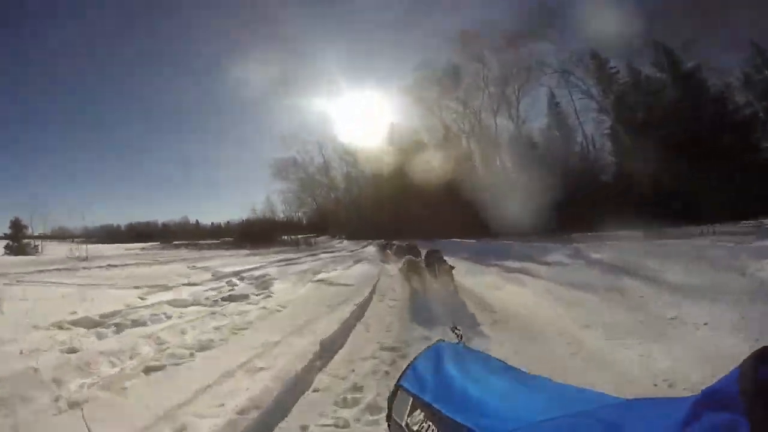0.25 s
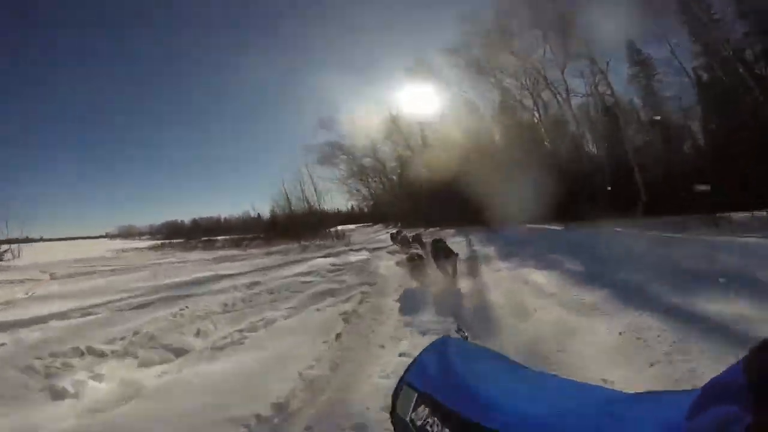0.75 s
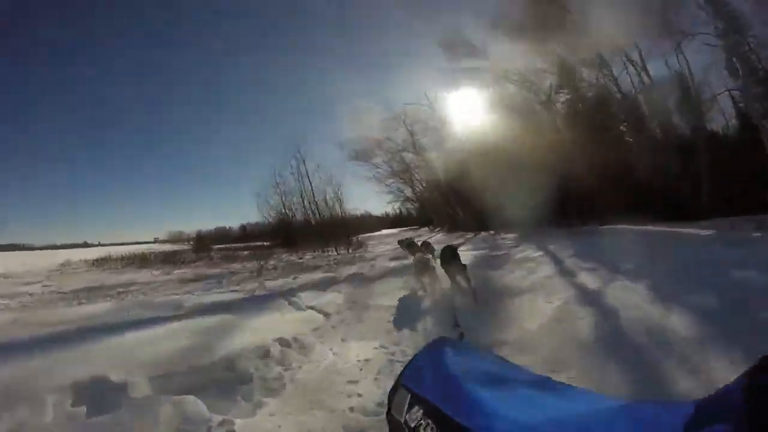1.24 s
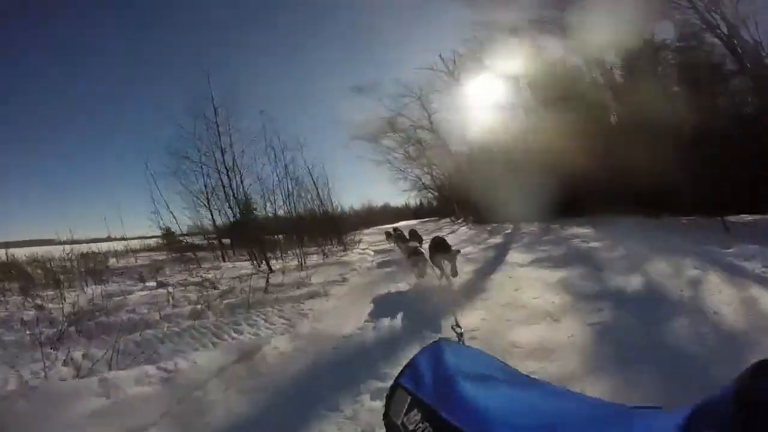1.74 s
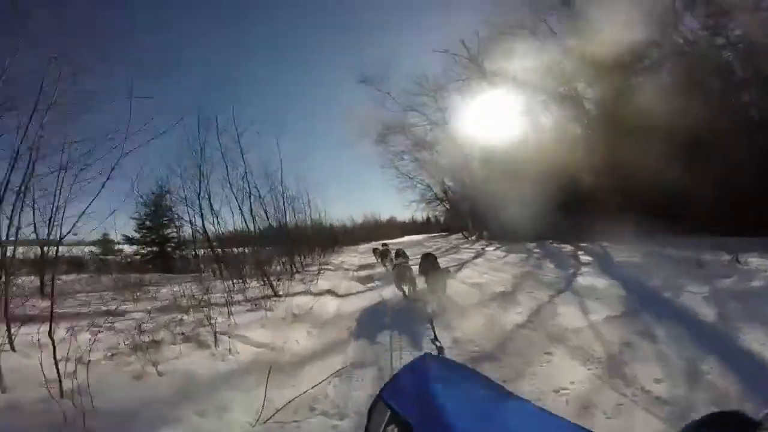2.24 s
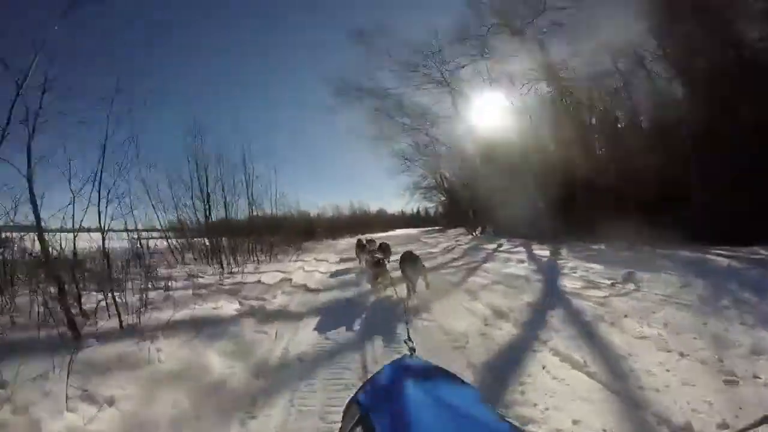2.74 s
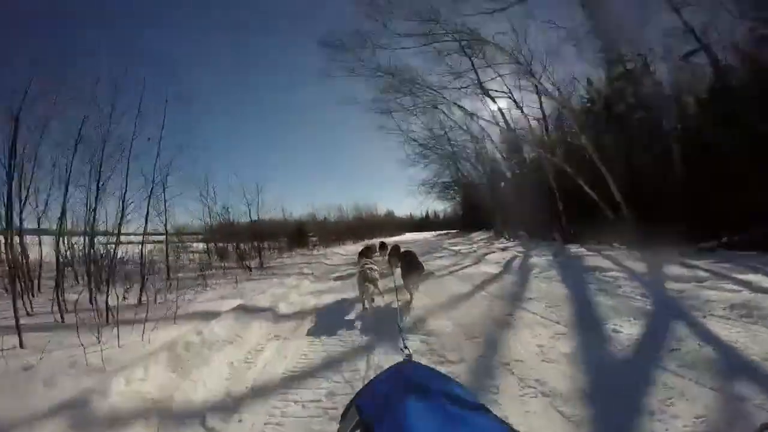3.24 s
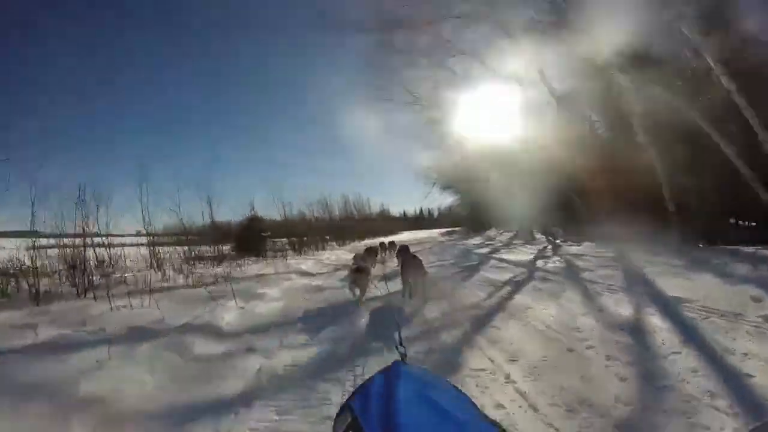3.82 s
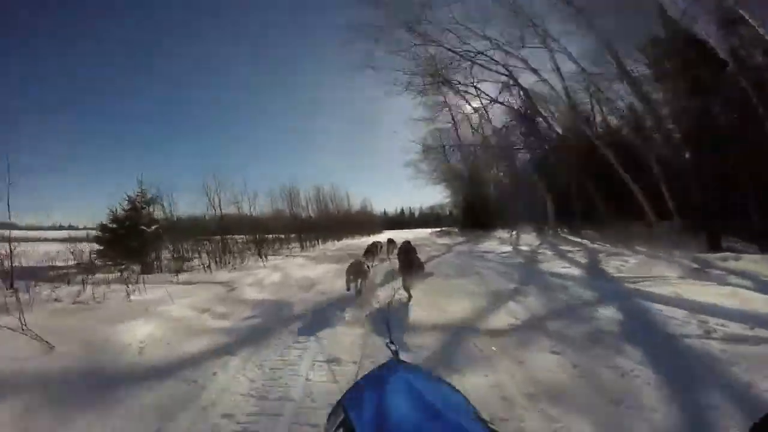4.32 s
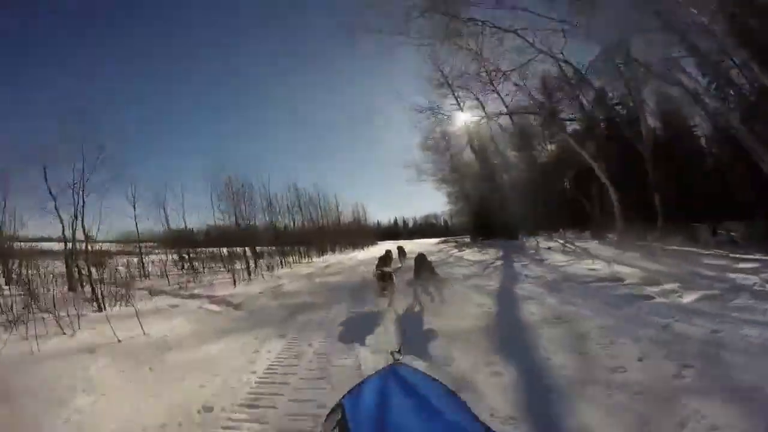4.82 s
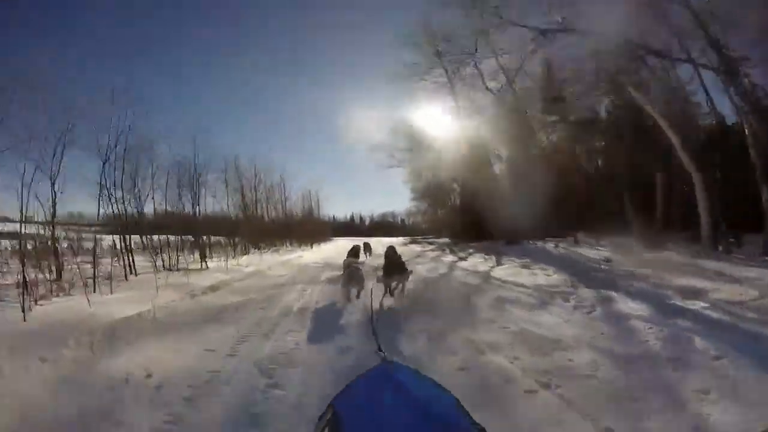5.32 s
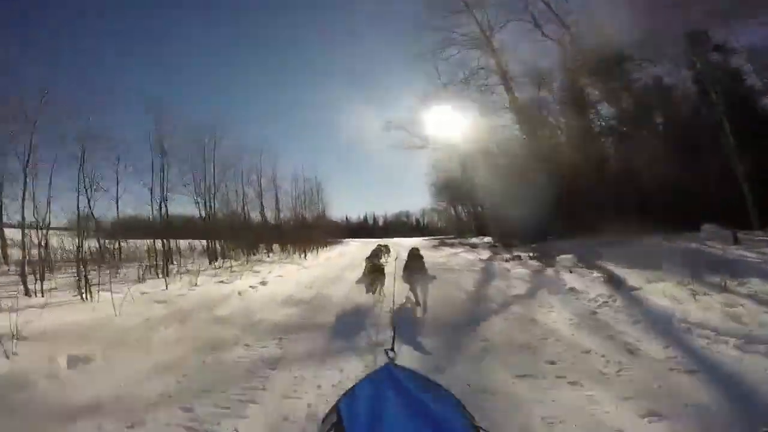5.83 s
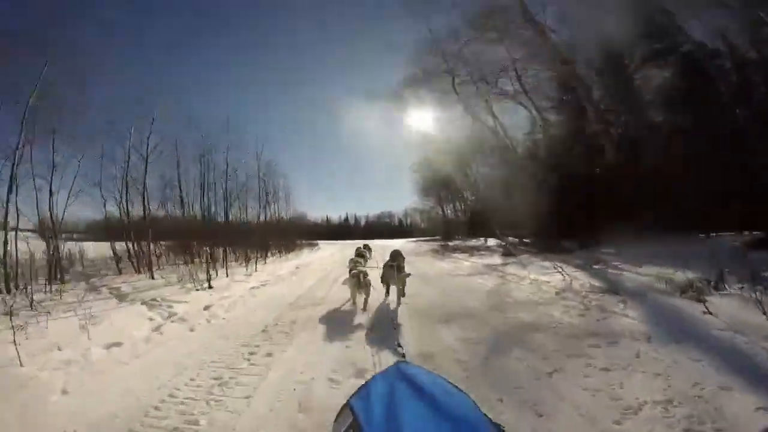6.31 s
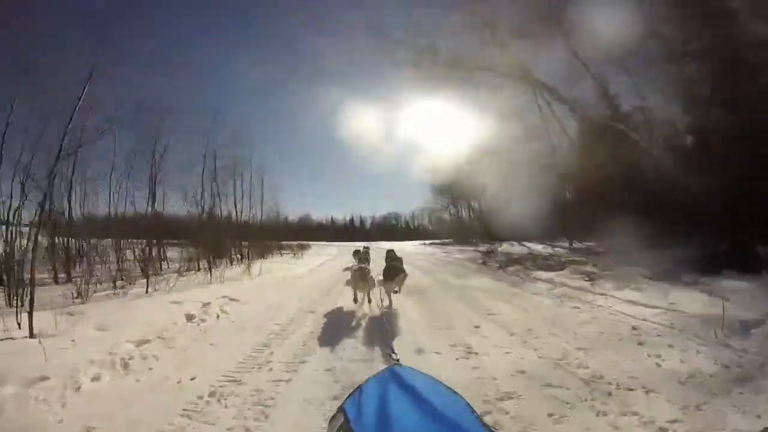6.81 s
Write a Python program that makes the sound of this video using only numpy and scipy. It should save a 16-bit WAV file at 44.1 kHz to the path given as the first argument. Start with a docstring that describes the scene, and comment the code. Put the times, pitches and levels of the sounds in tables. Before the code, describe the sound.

Lumpy low rumble and gritty hiss of sled runners on snow, broken by sharp case knocks, bright rattles, heavy jolts and tiny clinks.

```python
"""On a trail of packed snow, a camera in a closed plastic case rides a dog sled. The runners shake the mount:
noise bands in uneven lumps make a deep rumble, and grainy noise through the resonances of the case makes a hiss.
Noise gated by strong upward swings is the chatter of the camera in its case; bumps knock, thump and rattle the case
as decaying modes, tones and noise bursts. Ruts jolt the sled as low decaying tones with a scuff,
and something small clinks as short tones. A faint steady hiss lies beneath."""
import sys
import numpy as np
from scipy import signal
from scipy.fft import rfft, irfft, next_fast_len
from scipy.io import wavfile
from scipy.ndimage import uniform_filter1d, map_coordinates

SR = 44100
rng = np.random.default_rng(int(sys.argv[2]) if len(sys.argv) > 2 else 0)


def wav_record(signal):
    """Record a signal, one row per channel, as 16-bit PCM in the file named by sys.argv[1]."""
    frames = np.transpose(np.atleast_2d(signal))
    bounded = np.clip(frames, -1, 1)
    # unit amplitude maps onto the largest positive 16-bit level
    quanta = np.round(bounded * 32767).astype(np.int16)
    wavfile.write(sys.argv[1], SR, quanta)


N = 311339

# Roughness of the trail. Each row: time in seconds, level of shaking in dB, share of fast shaking in dB,
# level of chatter in dB.
TRAIL = [(0.0, -11, -6.5, -45), (0.37, -13.5, -1, -44), (0.9, -12.5, -6, -45.5), (1.3, -11, -11, -44),
         (1.55, -14, -3, -44), (1.91, -13, -6.5, -44), (2.28, -25, -1.5, -51.5), (2.44, -15.5, -2.5, -48),
         (2.54, -22.5, -5.5, -51.5), (2.9, -11, -6.5, -48.5), (3.42, -17, -2, -50.5), (3.8, -12.5, -3, -51),
         (3.98, -20, -2.5, -59), (4.2, -13, -1.5, -46.5), (4.76, -12.5, -5, -46.5), (5.1, -18.5, -4, -49),
         (5.45, -13.5, -3.5, -47), (5.82, -17, -7, -52.5), (6.3, -13, -5, -48.5), (7.06, -13, -4, -49)]
# Blows on the case. Each row: start in seconds, level in dB, dull part in dB, snap part in dB.
KNOCKS = [(0.139, -2.5, -18, -8.5), (0.521, -15, -12, 6), (0.573, -13.5, 6, -7), (0.868, -14.5, 5.5, -12),
          (1.295, -12.5, 1, -14), (1.771, -14, 6.5, -3.5), (2.46, -12, -4, 3), (2.625, -8, -4.5, -1.5),
          (2.785, -18.5, 11.5, -15.5), (2.886, -14.5, 6.5, 4), (2.906, -14, 0, -7), (2.966, -12, -8, 5.5),
          (3.054, -17.5, -3, 4.5), (3.105, -14, 4, -10.5), (3.137, -10, -2, -5), (3.182, -8.5, 1.5, -9.5),
          (3.217, -9, -4, 2), (3.431, -6.5, -6, 4), (3.612, -14.5, 4, -9), (3.642, -10.5, -1, -4.5),
          (3.694, -4.5, -2, -10), (3.73, -16, 4, -1), (3.784, -17.5, 7, -8.5), (3.842, -3.5, -10, -9),
          (3.884, -17, -6, 2), (3.969, -7, -9, 4), (4.368, -9, -8, 1.5), (4.847, -9.5, -15, -3),
          (5.134, -14, -10, -11), (5.529, -4.5, -7, 2), (6.028, -5.5, -19, -2), (6.071, -6, -1.5, -22),
          (6.112, -19, 6.5, -14), (6.144, -11.5, 4.5, -10), (6.177, -10.5, -1, -1), (6.222, -15, 6.5, -10),
          (6.252, -12.5, -14, -9.5), (6.479, -13, -11, 1), (7.042, -7.5, 4, -14)]
# Bright rattles of the camera against the case. Each row: start in seconds, level in dB.
RATTLES = [(0.4278, -26), (0.521, -26), (0.643, -27), (0.718, -28.5), (1.022, -25.5), (1.1306, -23.5),
           (1.4355, -21.5), (2.8824, -26), (3.052, -30.5), (3.108, -20.5), (3.215, -29), (3.4077, -28.5),
           (3.4333, -22), (3.6145, -25), (3.645, -26.5), (3.699, -19), (3.79, -24), (3.8131, -21.5),
           (3.848, -23.5), (3.8884, -24.5), (3.969, -18), (4.367, -30), (4.4463, -24), (4.5212, -26),
           (4.6774, -29), (4.7618, -20.5), (4.804, -21.5), (4.8952, -23), (5.2875, -31), (5.302, -24),
           (5.4862, -27), (5.531, -23.5), (5.6311, -25.5), (5.693, -26), (5.835, -27.5), (6.007, -19),
           (6.146, -22.5), (6.2284, -16.5), (6.3737, -19.5), (6.4716, -30)]
# Modes of the case. Each row: frequency in Hz, width in Hz, level in the hiss in dB, level in a blow in dB.
CASE_MODES = [(423, 49, 2, 0.5), (642, 160, 4, 3), (1193, 133, 6.5, 6.5), (1525, 69, 6.5, 5),
              (1750, 10.3, -14.5, 12), (2292, 167, 8, 6.5), (2643, 150, 6, 8.5), (2965, 50, -26, 5.5),
              (3380, 83, -1.5, 1), (3990, 46, -48, -5), (4670, 110, -27, 0), (5460, 93, -30.5, -2),
              (6500, 310, -40, -6.5)]
# Spectrum of the slow shaking. Each row: frequency in Hz, relative density in dB per Hz.
SWAY_SPECTRUM = [(8.8, -44.5), (15, -4), (38, -14), (91, 0), (150, -1.5), (200, -34), (330, -120)]
# Spectrum of the fast shaking. Each row: frequency in Hz, relative density in dB per Hz.
JUDDER_SPECTRUM = [(71, -52), (120, -2), (230, -2), (251, -8), (308, -24.5), (550, -37), (720, -42.5),
                   (1210, -120)]
# Spectrum of chatter and rattles. Each row: frequency in Hz, relative density in dB per Hz.
BRIGHT_SPECTRUM = [(2000, -8.5), (3000, 1.5), (3700, -4.5), (4050, 6), (4600, -18), (4900, -7.5),
                   (6500, -5), (7000, -7), (8300, -5.5), (9200, -12.5), (9900, -21.5), (11500, -19),
                   (13000, -29.5), (15500, -36.5)]
# Jolts of the sled over ruts. Each row: start in seconds, level in dB, pitch in Hz.
JOLTS = [(0.457, 0, 169), (1.521, -13, 174), (1.812, -4, 160), (2.354, -2.5, 142), (2.785, 0.5, 218),
         (3.645, -2.5, 192), (3.864, 1, 110), (4.297, -6, 220), (4.767, 0.5, 140), (4.801, 4, 161),
         (5.129, 1.5, 154), (5.631, -3, 106), (6.005, 4, 100), (6.213, 3.5, 207), (6.523, 0.5, 227)]
# Transmission of the case wall, with a dip under 1 kHz. Each row: frequency in Hz, relative gain in dB.
WALL_GAIN = [(700, 2), (900, -4), (1080, 3), (3000, -1.5), (3800, -12.5), (5000, -31), (7000, -24),
             (10000, -23), (16000, -72)]
# Small pitched clinks. Each row: start in seconds, level in dB, pitch in Hz.
CLINKS = [(2.169, -26, 2420), (2.2343, -19.5, 2230), (2.654, -19.5, 2290), (2.9792, -15, 2230),
          (3.32, -18, 2240), (4.8893, -22, 2330), (5.2308, -19, 2270), (5.5838, -21, 2210),
          (5.9184, -19, 2230), (6.744, -19, 2590), (6.979, -22, 2290)]
# Hollow thumps on the low wall of the case. Each row: start in seconds, level in dB.
THUMPS = [(2.785, -20), (2.906, -15.5), (6.215, -20), (7.043, -18)]
# Spectrum of the scuff in a jolt. Each row: frequency in Hz, relative density in dB per Hz.
SCUFF_SPECTRUM = [(150, -26.5), (300, -9), (500, -4.0), (900, -25.5), (3000, -56.5)]
# Spectrum of the faint steady hiss. Each row: frequency in Hz, relative density in dB per Hz.
FLOOR_SPECTRUM = [(2500, -6.5), (4000, -3.5), (6500, -5.5), (8000, -11), (12000, -22), (15500, -38)]

TOP_HZ = 15800
HISS_DB, HISS_FOLLOWS = -30, 0.4  # runner hiss at 0 dB of fast shaking; dB it moves per dB of fast shaking
BRIGHT_PART_DB, CRACK_DB = -5.5, 3  # both relative to the snap part
TAPS_PER_S = 9
TAP_DB, TAP_SPREAD_DB = -21, 4.5  # level on a trail of mean roughness; largest random change either way
TAP_DULL_DB, TAP_SNAP_DB, TAP_PLACE_DB = -0.5, -3, 6  # middle of each part; largest change with place
THUMP_T60_S, THUMP_ATTACK_S = 0.054, 0.0022


def amp(db):
    """The decibel law: gain of a level in dB."""
    return 10 ** (np.asarray(db) / 20)


def unit(x):
    """Normalisation of power: x at rms 1."""
    return x / np.sqrt(np.mean(x ** 2) + 1e-20)


def curves(rows):
    """Linear interpolation: one value per sample for each column after the time."""
    s, *cols = np.transpose(rows)
    return [np.interp(np.arange(N) / SR, s, c) for c in cols]


def wobble(rate):
    """Smooth random modulation: a spline through random knots, rate knots a second."""
    knots = rng.standard_normal(int(N * rate / SR) + 4)
    return map_coordinates(knots, [np.arange(N) * rate / SR])


def filtered(x, response):
    """Linear filtering: the spectrum of x times a response of frequency."""
    m = next_fast_len(len(x) + 8192)  # room for the filter to ring out
    return irfft(rfft(x, m) * response(np.fft.rfftfreq(m, 1 / SR)), m)[:len(x)]


def coloured(x, spectrum):
    """Spectral shaping through (Hz, dB) points, scaled so that white noise keeps its level."""
    f, db = np.transpose(spectrum)
    return filtered(x, lambda hz: unit(amp(np.interp(np.log(hz + 1), np.log(f + 1), db))))


def noise(spectrum):
    """Coloured noise: white noise shaped by (Hz, dB) points, at rms 1."""
    return unit(coloured(rng.standard_normal(N), spectrum))


def decay(t, t60):
    """Exponential damping: a fall of 60 dB in t60 seconds."""
    return amp(-60 * t / t60)


def onset(t, seconds):
    """Exponential build-up with a time constant in seconds."""
    return 1 - np.exp(-t / seconds)


def add_at(out, s, sound):
    """Superposition: adds a sound to out, starting at s seconds."""
    out[round(s * SR):][:len(sound)] += sound


def floor_hiss():
    """Stationary noise: a faint steady hiss of fixed spectrum."""
    return amp(-64.5) * noise(FLOOR_SPECTRUM)


def clinks():
    """Free vibration of one damped mode: each clink is a short tone with a soft start."""
    out, t = np.zeros(N + SR), np.arange(SR // 16) / SR
    for s, db, hz in CLINKS:
        tone = 1.67 * np.sin(2 * np.pi * hz * t)
        add_at(out, s, amp(db + 4) * decay(t, 0.018) * onset(t, 0.0019) * tone)
    return out[:N]


def thumps():
    """Selective excitation: a soft blow rings only the second mode of the case, with a hollow sound."""
    out, t = np.zeros(N + SR), np.arange(SR // 8) / SR
    mode = np.sin(2 * np.pi * CASE_MODES[1][0] * t)
    for s, db in THUMPS:
        add_at(out, s, amp(db) * decay(t, THUMP_T60_S) * onset(t, THUMP_ATTACK_S) * mode)
    return out[:N]


def rattles():
    """Impact noise with two decay rates: each bright burst has a sharp tick and a weaker buzzing tail."""
    loudness, t = np.zeros(N + SR), np.arange(SR // 8) / SR
    burst = (decay(t, 0.018) + 0.28 * decay(t, 0.052)) * onset(t, 0.00023)
    for s, db in RATTLES:
        add_at(loudness, s, amp(db - 5.5) * burst)
    grain = amp(2.75 * wobble(350))
    return coloured(loudness[:N] * grain * rng.standard_normal(N), BRIGHT_SPECTRUM)


def blows():
    """Random impacts: the listed knocks, then taps at random times and places, harder on a rougher trail."""
    s, size, place = rng.random((int(TAPS_PER_S * N / SR), 3)).T
    s = s * N / SR
    rough_db = np.interp(s, *np.transpose(TRAIL)[:2]) - np.mean(TRAIL, axis=0)[1]
    place_db = TAP_PLACE_DB * (2 * place - 1)
    level_db = TAP_DB + rough_db + TAP_SPREAD_DB * (2 * size - 1)
    return KNOCKS + list(zip(s, level_db, TAP_DULL_DB - place_db, TAP_SNAP_DB + place_db))


def knocks():
    """Modal excitation: a blow cracks and rings all modes of the case, at strengths that vary with each blow."""
    out, t = np.zeros(N + SR), np.arange(SR // 16) / SR
    hz, width, _, mode_db = np.transpose(CASE_MODES)[:, :, None]
    part = np.digitize(hz, [1400, 2500, 4400])  # dull, middle, snap and bright modes
    rows = blows()
    chance = rng.standard_normal((len(rows), 2, len(CASE_MODES), 1))
    damping = np.exp(-np.pi * (width + 120) * .8 * t)
    # the first few hard cycles
    crack = np.sin(2 * np.pi * 3100 * t) * t / 0.00087 * np.exp(1 - t / 0.00048)
    for (s, db, dull_db, snap_db), (size, detune) in zip(rows, chance):
        tilt_db = np.array([dull_db, 0, snap_db, snap_db + BRIGHT_PART_DB])[part]
        strength = amp(mode_db + tilt_db + 2 * size) * np.sqrt(width / 200)
        tones = np.sin(2 * np.pi * hz * (1 + 0.017 * detune) * t)
        ring = (strength * damping * tones).sum(axis=0) * onset(t, 0.0004)
        add_at(out, s, amp(db - 8) * (ring + amp(snap_db + CRACK_DB) * crack))
    return out[:N]


def chatter(shake):
    """Intermittent contact: in loose spells the camera fizzes in the case and ticks at fast upward swings."""
    level_db = curves(TRAIL)[2]
    speed = np.gradient(shake)
    speed = speed / np.sqrt(np.abs(uniform_filter1d(speed ** 2, size=SR // 8)) + 1e-12)
    lump = np.sqrt(np.abs(uniform_filter1d(speed ** 2, size=SR // 60)))
    # big swings shake the camera loose; stronger chatter leaves shorter pauses
    urge = 0.74 * wobble(60) + 1.9 * (lump - .9) + 0.19 * (level_db + 48.5)
    spells = 1 / (1 + np.exp(-3.2 * urge))
    loose = 0.012 * (level_db + 50.5).clip(0) + 0.02 + spells
    grain = amp(3 * wobble(600))
    touch = np.tanh(np.clip(speed - .8, 0, None)) * grain
    dying = decay(np.arange(SR // 10) / SR, 0.0086)
    ticks = unit(signal.fftconvolve(touch, dying)[:N])
    loudness = loose * (ticks + 0.5) + 0.004
    return amp(level_db) * coloured(loudness * rng.standard_normal(N), BRIGHT_SPECTRUM)


def jolts():
    """Transient response: a rut throws the mount into a quickly damped swing with a dull scuff."""
    out, t = np.zeros(N + SR), np.arange(SR // 10) / SR
    scuff_noise = noise(SCUFF_SPECTRUM)
    for s, db, hz in JOLTS:
        swing = amp(-0.5) * decay(t, 0.058) * np.sin(2 * np.pi * hz * t)
        scuff = amp(-27) * decay(t, 0.042) * np.roll(scuff_noise, -round(s * SR))[:len(t)]
        add_at(out, s, amp(db) * (swing + scuff) * onset(t, 0.0033))
    return out[:N]


def runners():
    """Resonant filtering: snow crystals break under the runners, heard through the modes and wall of the case.
    The low, middle and high modes belong to different walls, each shaken with its own grain."""
    hiss = np.zeros(N)
    for wall in (CASE_MODES[:2], CASE_MODES[2:5], CASE_MODES[5:]):
        def resonance(f):
            """Resonance: the sum of the band-pass responses of the modes of one wall."""
            return sum(amp(db) * 1j * f * w / (c * c - f * f + 1j * f * w) for c, w, db, _ in wall)

        grain = amp(3.9 * wobble(300) + 1.74 * wobble(25))
        hiss += filtered(unit(rng.standard_normal(N) * grain), resonance)
    level_db, fast_db = curves(TRAIL)[:2]
    return amp(HISS_DB + HISS_FOLLOWS * (level_db + fast_db)) * unit(coloured(hiss, WALL_GAIN))


def shaking():
    """Forced vibration: the runners judder over the trail and the mount carries it to the microphone in lumps."""
    level_db, fast_db = curves(TRAIL)[:2]
    fast = np.clip(amp(fast_db), 0, .95)
    sway = unit(amp(2.23 * wobble(14)) * noise(SWAY_SPECTRUM))
    judder = unit(amp(2.86 * wobble(23)) * noise(JUDDER_SPECTRUM))
    return amp(level_db) * (np.sqrt(1 - fast ** 2) * sway + fast * judder)  # the shares add in power


def scene():
    """Superposition: all sources add at one microphone, and the shaking with its jolts drives the chatter."""
    shake = shaking() + jolts()
    background = floor_hiss() + clinks()
    impacts = thumps() + rattles() + knocks()
    return (background + impacts + chatter(shake) + runners() + shake)[None]


def record(dry):
    """Saturation and band limiting: soft clipping of the largest swings, then a sharp cut at the top."""
    soft = dry[0] / (1 + np.abs(dry[0] / .95) ** 8) ** (1 / 8)
    return filtered(soft, lambda hz: hz < TOP_HZ)[None]


dry = scene()
out = record(dry)
wav_record(out)
```